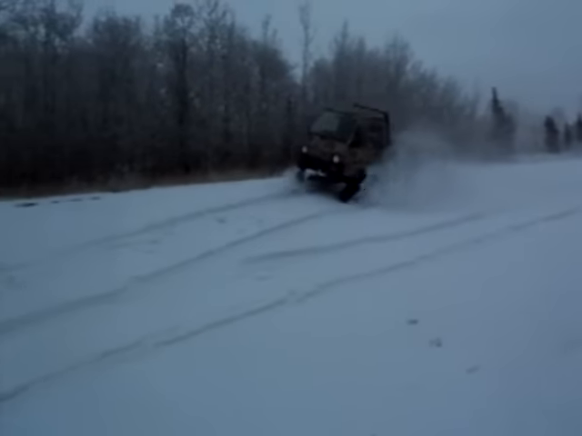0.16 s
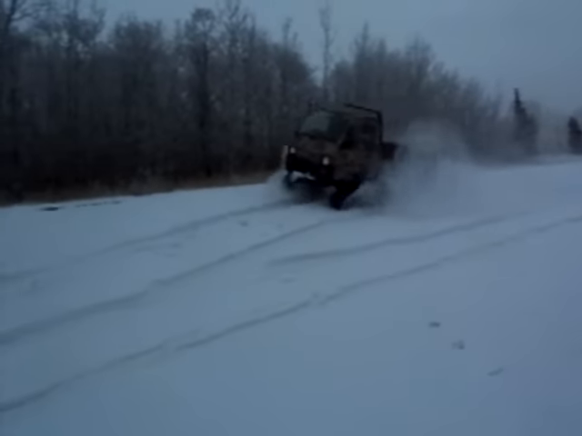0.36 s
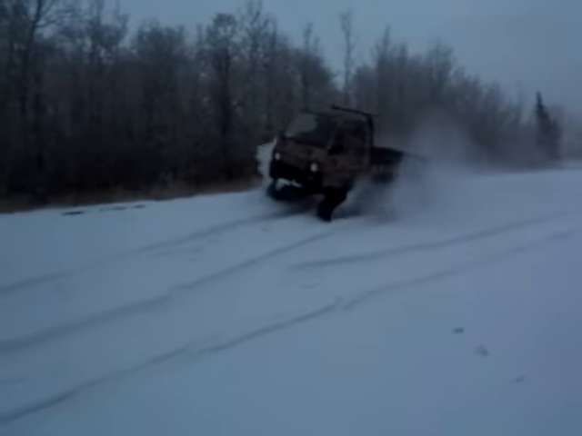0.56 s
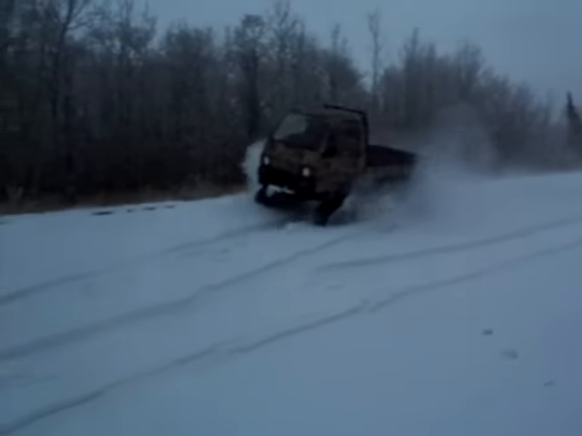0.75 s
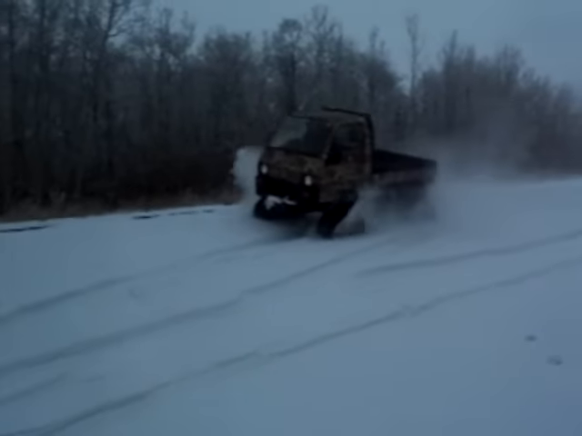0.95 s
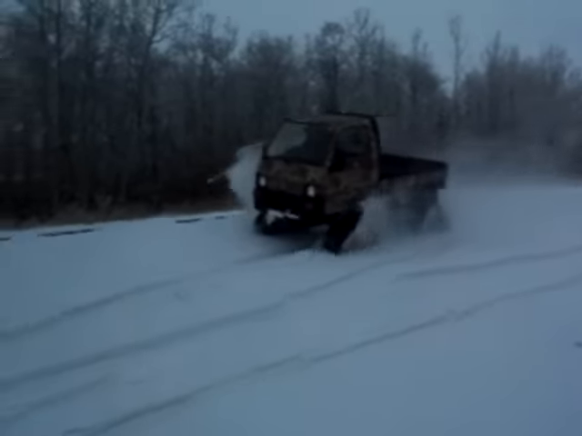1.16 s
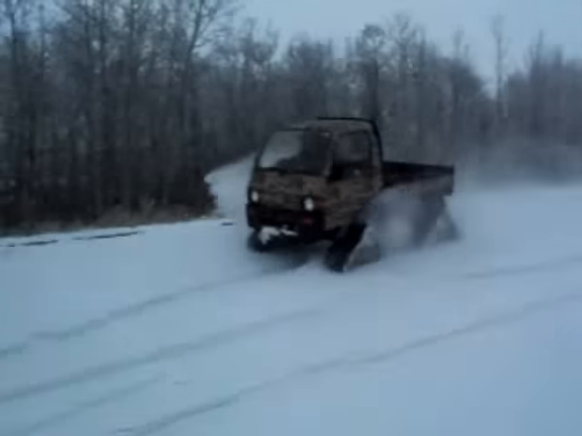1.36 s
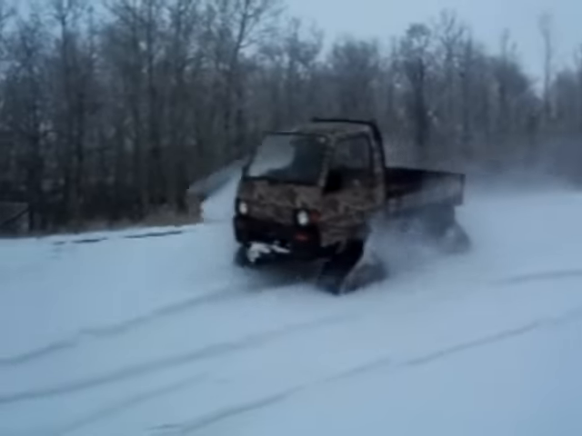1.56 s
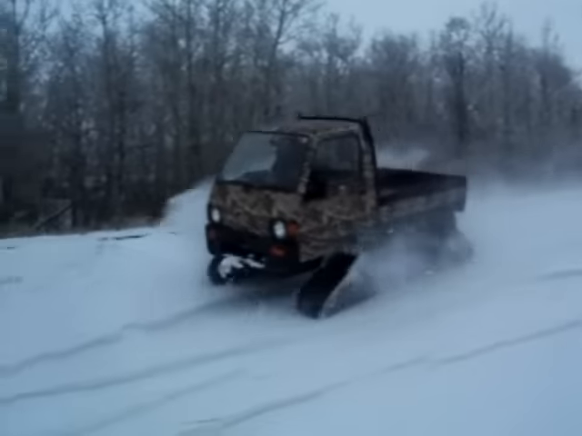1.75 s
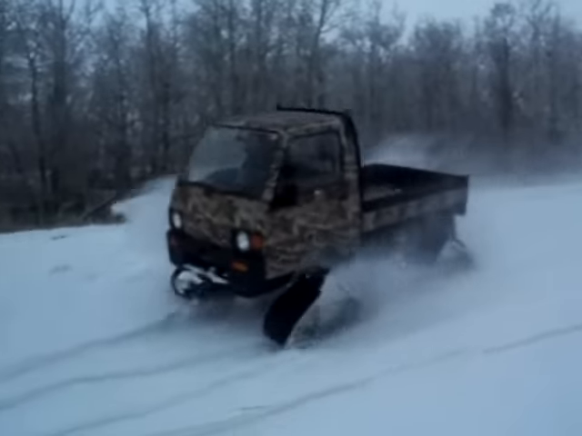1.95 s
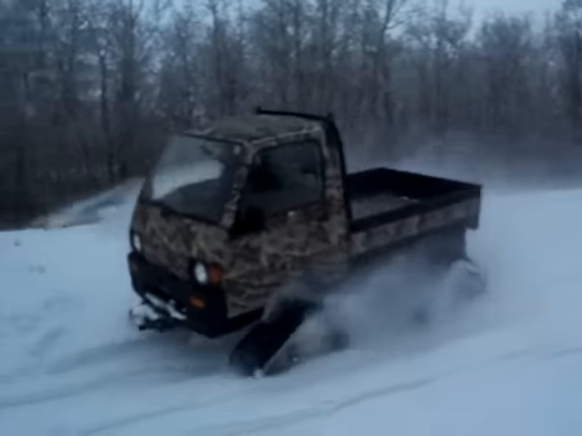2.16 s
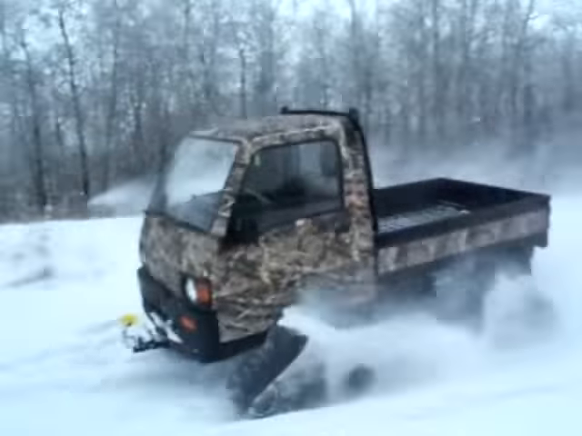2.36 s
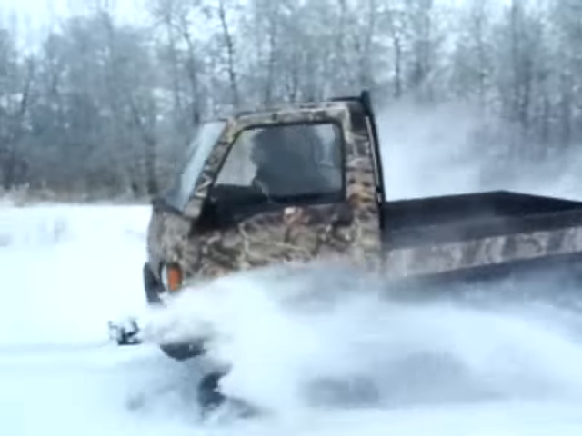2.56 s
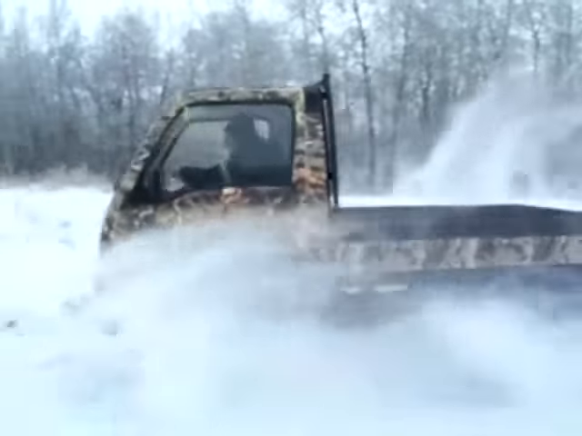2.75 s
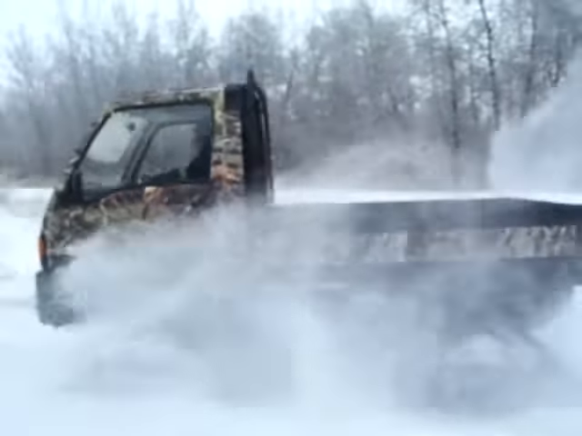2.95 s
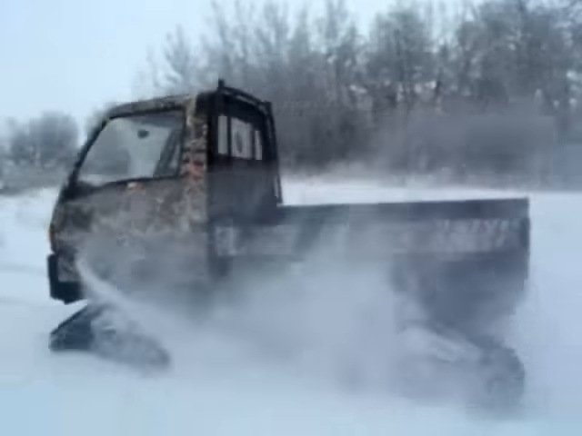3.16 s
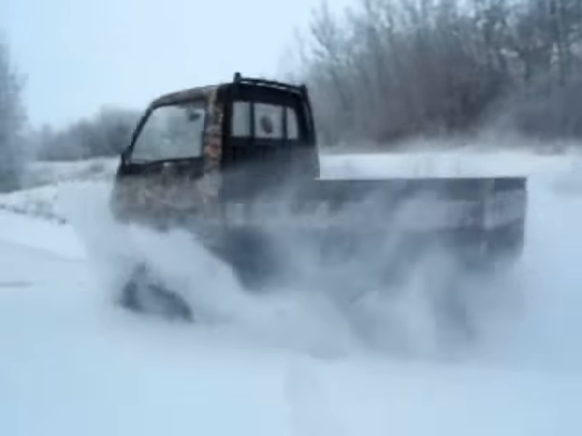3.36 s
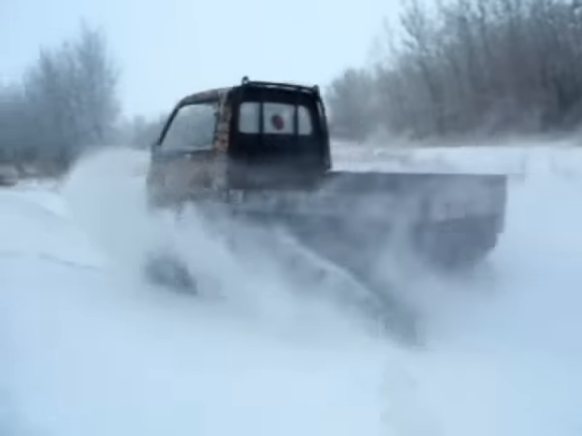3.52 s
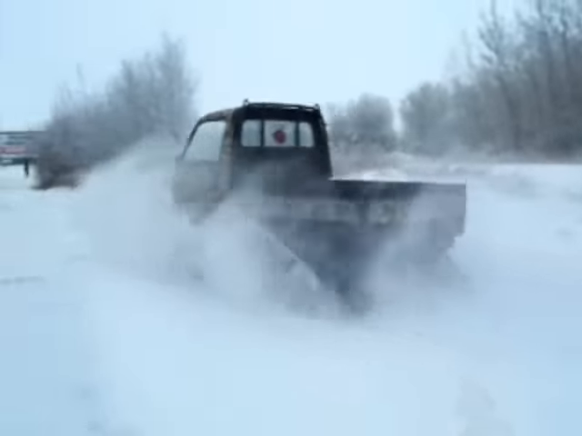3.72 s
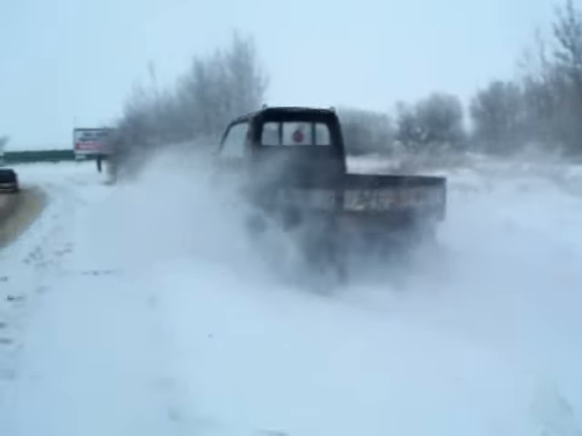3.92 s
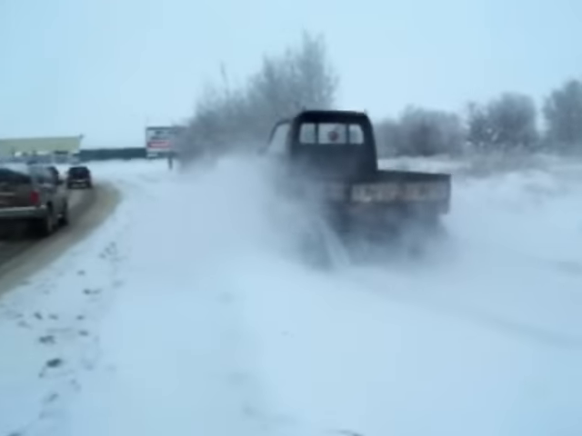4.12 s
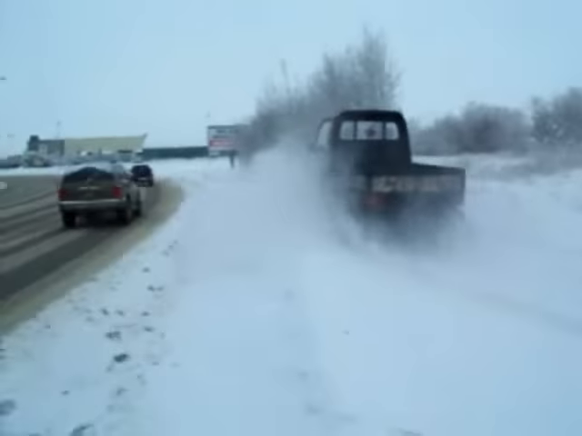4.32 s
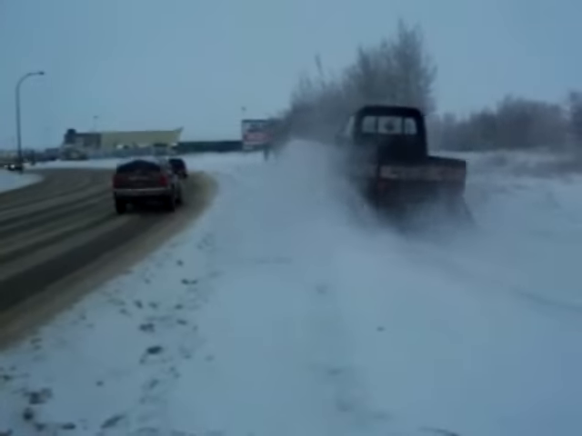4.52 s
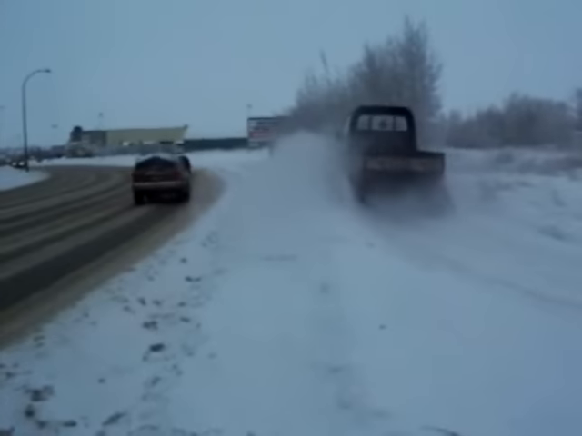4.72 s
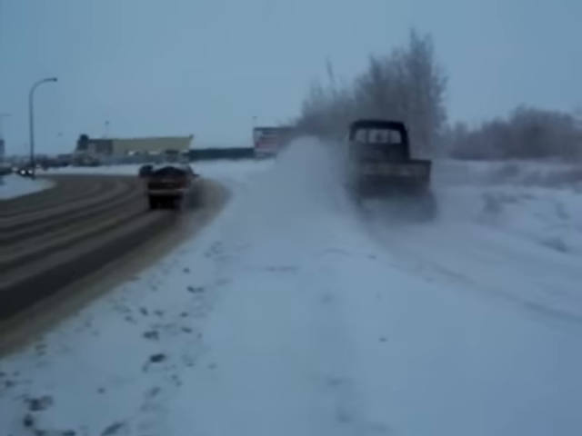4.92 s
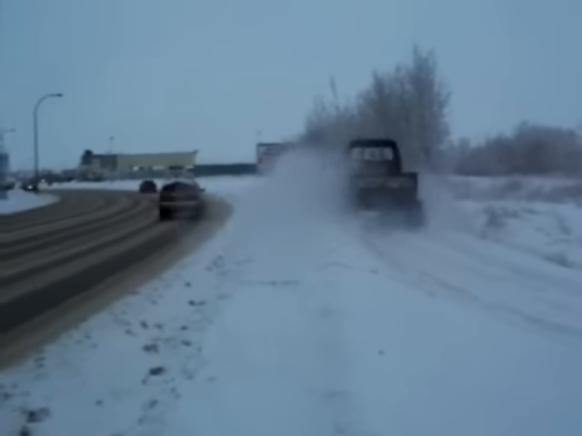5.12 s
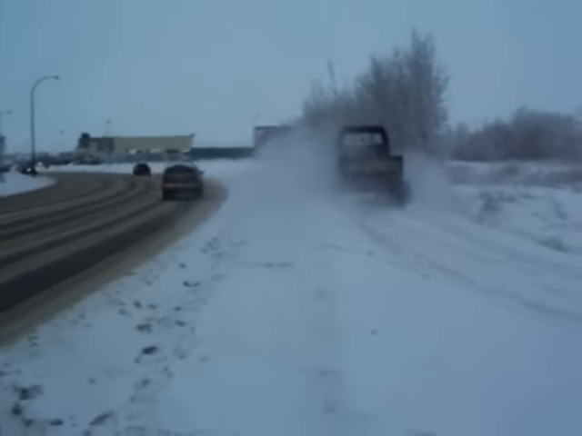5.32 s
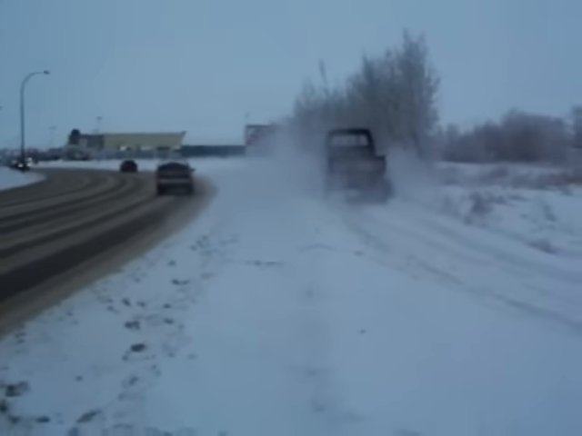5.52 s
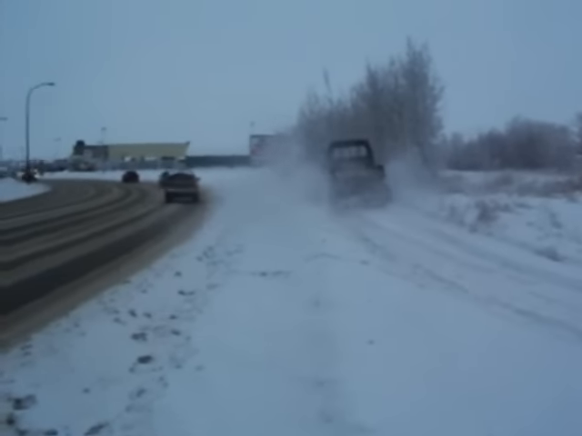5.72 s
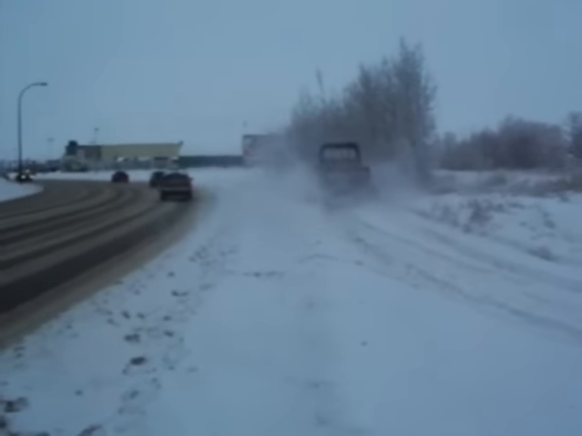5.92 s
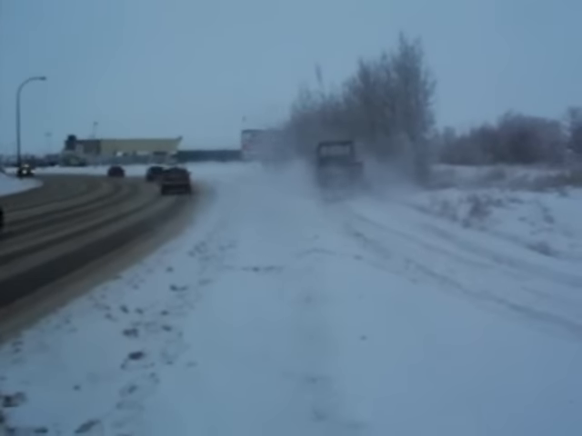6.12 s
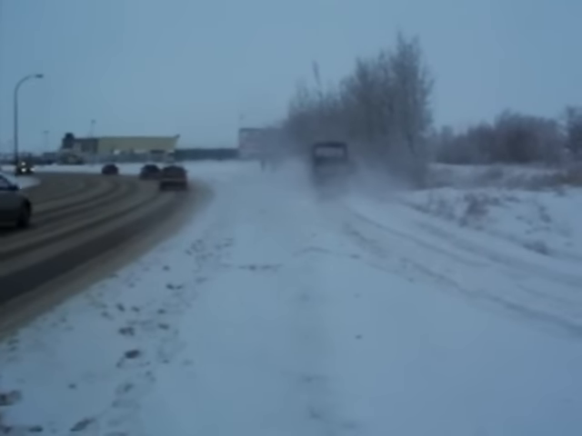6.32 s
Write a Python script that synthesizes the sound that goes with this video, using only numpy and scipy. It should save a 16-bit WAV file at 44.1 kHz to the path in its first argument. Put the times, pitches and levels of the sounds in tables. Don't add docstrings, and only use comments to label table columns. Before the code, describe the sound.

A continuous rough, buzzing drone of tracks and a small engine comes nearer, with metallic panel ringing and dull jolts. Around the middle it sweeps past the hand-held microphone, low throbbing and snow spray at their strongest. Receding, it thins into softer rattle, dry ticking lug slaps and small knocks, over distant road rumble and tyre hiss in an open snowy field.

```python
import sys
import numpy as np
from scipy import signal
from scipy.fft import rfft, irfft
from scipy.io import wavfile
from scipy.ndimage import uniform_filter1d

SR = 44100
rng = np.random.default_rng(int(sys.argv[2]) if len(sys.argv) > 2 else 0)


def wav_out(sig):
    wavfile.write(sys.argv[1], SR, np.round(np.clip(np.atleast_2d(sig).T, -1, 1) * 32767).astype(np.int16))


def amplitude_ratio(level_db):
    exponent = np.asarray(level_db, float) / 20
    return 10 ** exponent


N = 281358
ABREAST_S, TURN_S = 2.8, 0.51

# t/s, lug rate f/Hz, level/dB, second multiple against the first/dB
TRACK_DRUMMING = [(0, 68.2, -34, -19), (.3, 65.8, -40, -19), (.78, 63.9, -32.5, 1), (1.3, 67.6, -32, 2),
                  (1.5, 68.1, -33, 5), (1.65, 69.6, -46, 2), (1.76, 69.8, -34, -7), (2.05, 74.7, -31.5, 4),
                  (2.4, 72.24, -36, 2), (2.63, 75.3, -35, -12), (2.76, 74.9, -34, 12),
                  (2.95, 71.2, -28, -7), (3.1, 73.85, -36, -2), (3.32, 76.4, -29.5, 6),
                  (3.64, 76.5, -34.5, 14), (4.36, 71.9, -40.5, 16), (4.47, 71.74, -41, -4),
                  (6.38, 70.7, -42, 0)]
# t/s, drive-line effort level/dB, thrown snow level/dB
EFFORT_AND_SNOW = [(0, -33.5, -45), (.25, -34.5, -49), (.33, -41, -50.5), (.6, -35.5, -48),
                   (.78, -31.5, -44.5), (1.45, -32.5, -46), (1.62, -34.5, -48.5), (1.95, -31.5, -45),
                   (2.07, -35.5, -49.5), (2.27, -33.5, -46), (2.72, -32.5, -44.5), (3.05, -36.5, -46.5),
                   (3.34, -34.5, -42), (3.43, -36.5, -45), (3.9, -34.5, -42.5), (5.2, -38, -53),
                   (5.63, -36.5, -47), (6.38, -42, -53.5)]
# f/Hz, density/dB per Hz
SNOW_COLOUR = [(1120, -25.5), (1900, -1.5), (2110, -2), (2410, 2.5), (3090, -1.5), (3760, 1.5), (4240, 0.5),
               (5130, -4.5), (6300, -17), (8190, -43), (13900, -120)]


def noise():
    return rng.standard_normal(N)


def unit(x):
    return x / np.sqrt(np.mean(x ** 2))


def peak_one(x):
    return x / np.abs(x).max()


def curves(table):
    s, *columns = np.transpose(table)
    return [np.interp(np.arange(N) / SR, s, c) for c in columns]


def colour(x, points):
    size = 8192
    hz, db = np.transpose(points)
    bin_hz = np.arange(size // 2 + 1) * SR / size
    log_gain = np.log(amplitude_ratio(np.interp(np.log(bin_hz + 1), np.log(hz), db)))
    cepstrum = irfft(log_gain)
    cepstrum[1:size // 2] *= 2
    cepstrum[size // 2 + 1:] = 0
    response = irfft(np.exp(rfft(cepstrum)))
    return signal.fftconvolve(x, response)[:len(x)]


def ring(x, hz, width_hz):
    peak = signal.iirpeak(hz, hz / width_hz, SR)
    return signal.lfilter(*peak, signal.lfilter(*peak, x))


def walk(rate):
    hold = int(SR / rate)
    steps = np.repeat(rng.standard_normal(N // hold + 1), hold)
    return unit(uniform_filter1d(uniform_filter1d(steps, hold), hold)[:N])


def grains(rate, spread_db):
    hit = rng.random(N) < rate / SR
    return noise() * hit * amplitude_ratio(spread_db * np.minimum(rng.exponential(size=N), 3.5))


def burst(chance, decay_s):
    t = np.arange(len(chance)) / SR
    return chance * np.exp(-t / decay_s) * (1 - np.exp(-4 * t / decay_s))


def layer_db(usual_db, per_effort, per_snow, abreast_db, behind_db):
    effort_db, snow_db = curves(EFFORT_AND_SNOW)
    swing = np.tanh((np.arange(N) / SR - ABREAST_S) / TURN_S)
    work_db = per_effort * (effort_db + 36) + per_snow * (snow_db + 47)
    return usual_db + work_db + abreast_db * (1 - swing ** 2) + behind_db * (1 + swing) / 2


def road_rumble():
    # f/Hz, density/dB per Hz
    rumble_colour = [(12, -27), (20, 0), (124, 3.5), (188, 0.5), (304, -5.5), (380, 0), (490, -30),
                     (840, -120)]
    db = layer_db(-41, per_effort=.28, per_snow=.06, abreast_db=4, behind_db=-.5)
    return amplitude_ratio(db + 0.44 * walk(3.9)) * unit(colour(noise(), rumble_colour))


def traffic():
    db = layer_db(-63, per_effort=-1.5, per_snow=.55, abreast_db=-1, behind_db=9.5)
    return amplitude_ratio(db + 0.44 * walk(2.7)) * unit(ring(noise(), 2430, width_hz=2000))


def plume():
    centre_s, length_s, level_db = 3.75, .3, -53
    swell = np.exp(-((np.arange(N) / SR - centre_s) / length_s) ** 2)
    return amplitude_ratio(level_db + 1.0 * walk(16)) * swell * unit(ring(noise(), 5000, width_hz=2400))


def whines():
    whine_notes = [(0, .95, 725, 722, -45.5), (.2, 1.3, 648, 652, -47), (.45, 1.05, 1485, 1500, -52),
                   (2.55, 3.05, 1440, 1475, -43.5), (2.2, 2.37, 1165, 1185, -43),
                   (.85, 1.02, 1090, 1120, -46), (.45, .7, 1130, 1110, -48), (3.1, 3.4, 1770, 1770, -52),
                   (3.2, 3.75, 1003, 995, -46.5), (3.5, 4, 1555, 1535, -51), (4.07, 4.2, 376, 378, -42),
                   (4.38, 4.63, 364, 368, -43), (4.63, 4.8, 372, 374, -48), (4.5, 4.95, 1670, 1660, -53),
                   (4.7, 5.35, 1175, 1155, -51), (.55, 1.2, 4110, 4170, -56), (1.2, 1.5, 4170, 4200, -61),
                   (.7, 1.3, 3350, 3470, -63), (2.35, 2.61, 3800, 3900, -51.5),
                   (2.59, 3.03, 3870, 3900, -53), (3.26, 3.38, 3900, 3860, -53),
                   (3.42, 3.68, 3880, 3860, -52), (3.7, 4.35, 3860, 3780, -56.5),
                   (4.4, 4.75, 4390, 4380, -58.5), (4.5, 5.95, 2910, 2880, -60),
                   (4.9, 5.7, 4310, 4340, -63), (0, .2, 4060, 4050, -59), (2.45, 2.72, 3640, 3600, -55),
                   (2.78, 2.98, 4180, 4260, -55), (3, 3.8, 4300, 4200, -61), (4.7, 5.45, 5010, 5000, -68),
                   (4.5, 6.2, 2250, 2240, -60)]
    out, t = 0, np.arange(N) / SR
    for start, end, first_hz, last_hz, db in whine_notes:
        hz = np.interp(t, (start, end), (first_hz, last_hz)) * (1 + .0065 * walk(60))
        fade = np.clip(np.minimum(t - start, end - t) / 0.025, 0, 1)
        broken = .8 + .26 * walk(25)
        out = out + fade * amplitude_ratio(db) * broken * np.sqrt(2) * np.sin(2 * np.pi * np.cumsum(hz) / SR)
    return out


def engine():
    # t/s, firing rate f/Hz, level/dB
    firing = [(0, 101.4, -42), (.45, 101.7, -49.5), (.8, 103.6, -47.5), (1.3, 106.1, -44.5),
              (1.7, 107, -43), (2.2, 112.1, -52), (2.6, 111, -42), (2.85, 110, -55), (3.5, 112.2, -63),
              (4.1, 110.6, -40.5), (4.3, 108.6, -56), (4.5, 111, -52), (5.55, 117.3, -45.5),
              (5.7, 110.5, -70), (6, 105.3, -44.5), (6.38, 108.3, -46)]
    hz, db = curves(firing)
    turn = 2 * np.pi * np.cumsum(hz * (1 + 0.0077 * walk(17))) / SR
    return amplitude_ratio(db + 1.5 * walk(15)) * np.sqrt(2) * (np.sin(turn) + amplitude_ratio(-20) * np.sin(2 * turn))


def body(broad, grain_db):
    shake = noise() + amplitude_ratio(grain_db) * unit(grains(900, 1.6))
    return unit(colour(shake, broad) * amplitude_ratio(1.03 * walk(18)))


def rattle():
    # f/Hz, density/dB per Hz
    low_body = [(150, -29), (260, -6), (373, -4.5), (434, 1.5), (508, 1), (563, 1.5), (633, 1), (803, -4.5),
                (1000, -5), (1300, -19.5), (2200, -120)]
    # f/Hz, density/dB per Hz
    high_body = [(470, -23), (800, -1.5), (1100, -1.5), (1270, -1.5), (1370, -1), (1760, -6.5),
                 (2050, -16.5), (2300, -20.5), (2990, -32.5), (5060, -120)]
    low_db = layer_db(-38.5, per_effort=1.19, per_snow=-.35, abreast_db=-.7, behind_db=-2)
    high_db = layer_db(-37.5, per_effort=.32, per_snow=.21, abreast_db=.15, behind_db=.24)
    return amplitude_ratio(low_db) * body(low_body, -7) + amplitude_ratio(high_db) * body(high_body, -8)


def panel(hz, width_hz, share, drift):
    passed = (1 + np.tanh((np.arange(N) / SR - ABREAST_S - TURN_S) / TURN_S)) / 2
    gear_hz = hz * drift * (1 - .022 * passed)
    wavering_hz = gear_hz + .3 * width_hz * walk(60)
    note = np.sqrt(2) * np.sin(2 * np.pi * np.cumsum(wavering_hz) / SR)
    return np.sqrt(share) * note + np.sqrt(1 - share) * unit(ring(noise(), hz, 1.6 * width_hz))


def panels():
    # group (0 floor pan, 1 cab, 2 bed), f/Hz, width/Hz, level/dB
    resonances = [
        (0, 380, 40, -12),
        (0, 495, 30, -8),
        (0, 520, 25, -5),
        (1, 645, 30, -8.5),
        (1, 720, 36, -8),
        (2, 1235, 35, -13),
        (2, 1292, 30, -6.5),
    ]
    # group, start t/s, end t/s, level/dB
    spells = [(0, .7, .98, -37.5), (0, .98, 1.25, -41), (0, 1.25, 1.6, -42), (0, 1.75, 2.02, -38.5),
              (0, 2.02, 2.45, -42), (0, 2.6, 3.5, -45), (0, 3.6, 4.62, -41), (1, 0, .28, -42),
              (1, .72, .97, -36), (1, .97, 1.55, -40), (1, 1.8, 2.05, -39), (1, 2.56, 2.8, -34),
              (1, 2.8, 3.03, -36), (1, 3.15, 3.4, -38), (1, 3.4, 3.75, -42), (1, 3.75, 4.5, -37.5),
              (1, 4.6, 6.38, -44), (2, 0, .3, -41), (2, .3, 1.35, -35.5), (2, 1.35, 1.67, -38),
              (2, 1.9, 2.06, -36), (2, 2.22, 2.56, -36.5), (2, 2.56, 3.02, -41), (2, 3.76, 4.3, -38)]
    # t/s, floor pan share, bed share
    gear_drift = [(.8, 1, 1), (.95, 1, .978), (1.35, 1, .97), (1.48, 1.01, 1.008), (1.65, 1, 1),
                  (1.92, 1.01, .955), (2.05, .97, .96), (2.25, .96, .965), (2.4, .935, .995),
                  (2.6, 1, 1.008), (3.05, 1, 1.01)]
    fade_s, resting_db = 0.046, -53.5
    t, groups = np.arange(N) / SR, np.full((3, N), amplitude_ratio(resting_db))
    for group, start, end, db in spells:
        fade = np.clip(np.minimum(t - start, end - t) / fade_s + .5, 0, 1)
        groups[int(round(group))] += amplitude_ratio(db) * fade
    floor_pan, bed = curves(gear_drift)
    drift = (floor_pan, 1, bed)
    tone_share = (.65, .7, .92)
    out = 0
    for group, hz, width_hz, db in resonances:
        group = int(round(group))
        gain = groups[group] * amplitude_ratio(db + .7 * walk(5))
        out = out + gain * panel(hz, width_hz, tone_share[group], drift[group])
    return out


def jolts():
    # t/s, peak level/dB, ring f/Hz
    ruts = [(0.692, -25.5, 521), (0.748, -19.5, 527), (0.834, -19.5, 529), (0.892, -21, 637),
            (0.955, -24.5, 500), (1.066, -23, 535), (1.152, -22, 517), (1.212, -23, 616), (1.348, -24, 514),
            (1.546, -21.5, 524), (1.674, -26, 645), (1.726, -27, 498), (1.793, -25, 498), (1.856, -27, 524),
            (1.906, -27, 523), (2.29, -31, 490), (2.385, -34, 470), (2.414, -26, 415), (2.601, -24, 591),
            (2.631, -30, 546), (2.673, -23, 509), (2.78, -27, 768), (2.896, -23, 637), (2.942, -23.5, 690),
            (2.982, -29, 735), (3.136, -25, 704), (3.253, -31, 619), (3.935, -22.5, 615), (3.979, -20, 636),
            (4.087, -26, 708), (5.556, -31, 1553), (5.571, -29, 788), (5.586, -31, 1598),
            (5.631, -24, 1497), (5.652, -32, 1560), (5.714, -26, 1600), (5.764, -27, 791)]
    out, t = np.zeros(N), np.arange(4000) / SR
    rise_s, decay_s, trim_db = .003, .011, -7
    shape = peak_one(np.exp(-t / decay_s) * (1 - np.exp(-t / rise_s)))
    for (s, db, hz), chance in zip(ruts, rng.standard_normal((len(ruts), len(t)))):
        rough = .35 * unit(ring(chance, hz, 250))
        at = int(s * SR)
        out[at:at + len(t)] += amplitude_ratio(db + trim_db) * shape * (np.sin(2 * np.pi * hz * t) + rough)
    return out


def knocks():
    # t/s, peak level/dB, ring f/Hz
    thuds = [(.1635, -24, 800), (0.1667, -17, 1040), (0.213, -20, 1000), (0.2414, -11.5, 690),
             (0.247, -21, 600), (5.425, -25, 1400), (5.548, -32, 1400), (5.56, -31, 1600),
             (5.732, -24, 1200), (5.585, -27, 1300), (5.61, -28, 1500), (5.675, -27, 1300),
             (5.632, -22, 1530), (5.645, -26, 1300), (5.66, -22, 1490), (5.718, -25, 1500)]
    out, t = np.zeros(N), np.arange(2000) / SR
    shape = (t / 0.00087) * np.exp(1 - t / 0.00063)
    for s, db, hz in thuds:
        at = int(s * SR)
        out[at:at + len(t)] += amplitude_ratio(db) * np.sin(2 * np.pi * hz * t) * shape
    return out


def clods():
    # t/s, peak level/dB
    splashes = [(.164, -30), (.2465, -26), (.772, -33), (.83, -33), (.887, -32), (2.22, -33), (2.2485, -34),
                (2.28, -35), (2.3044, -37), (2.3326, -28), (2.36, -35), (2.41, -33), (2.4412, -32),
                (5.545, -38), (5.5594, -32), (5.575, -32), (5.62, -36), (5.655, -36), (5.74, -35)]
    out, size = np.zeros(N), 2000
    for (s, db), chance in zip(splashes, rng.standard_normal((len(splashes), size))):
        at = int(s * SR)
        out[at:at + size] += amplitude_ratio(db - 3) * peak_one(colour(burst(chance, .005), SNOW_COLOUR))
    return out


def spray():
    # f/Hz, density/dB per Hz
    fine_colour = [(4500, -36.5), (6300, -9), (6800, -7), (7400, -6.5), (8050, -13), (8700, -7),
                   (9400, -28), (11000, -65.5)]
    # f/Hz, density/dB per Hz
    finest_colour = [(7000, -30), (8050, -7), (8700, -1), (9150, -1.5), (9450, -26), (11000, -66)]
    lug_hz, coarse_db = curves(TRACK_DRUMMING)[0], curves(EFFORT_AND_SNOW)[1] - .7
    fine_db = layer_db(-59, per_effort=0, per_snow=.82, abreast_db=-1, behind_db=-3.5)
    finest_db = layer_db(-62.5, per_effort=-.04, per_snow=1.3, abreast_db=-1.5, behind_db=-1.5)
    turn = np.cumsum(lug_hz) / SR / 2 % 1
    back_shown_s = 4.3
    depth = np.clip(.3 + .3 * walk(2), 0, 2) * (np.arange(N) < back_shown_s * SR)
    pulse = (1 + depth * np.exp(-turn / .13)) / (1 + .15 * depth)
    hiss = (noise() + amplitude_ratio(-7) * unit(grains(800, 1.8))) * pulse
    hiss = hiss * amplitude_ratio(.55 * walk(10) + .6 * walk(25))
    coarse = amplitude_ratio(coarse_db) * unit(colour(hiss, SNOW_COLOUR))
    fine = amplitude_ratio(fine_db + .6 * walk(9)) * unit(colour(hiss, fine_colour))
    finest = amplitude_ratio(finest_db) * unit(colour(hiss, finest_colour))
    return coarse + fine + finest


def slap_times():
    # t/s, snap level/dB, top level/dB
    first_run = [(4.3134, -41, -49), (4.3266, -34, -42), (4.3574, -35, -58), (4.3854, -31, -45),
                 (4.4154, -31, -41), (4.4428, -33, -46), (4.4727, -33, -41), (4.4994, -37, -48),
                 (4.5276, -32, -43), (4.557, -32, -45), (4.5865, -38, -47), (4.6144, -36, -45),
                 (4.6458, -36, -45), (4.6748, -34, -39), (4.7067, -37, -46), (4.7354, -38, -45),
                 (4.7654, -38, -54), (4.796, -36, -43), (4.8234, -36, -45), (4.8524, -31, -39),
                 (4.8813, -33, -42), (4.9107, -32, -42), (4.9374, -37, -48), (4.9656, -32, -45)]
    # t/s, snap level/dB, top level/dB
    lone = [(5.0545, -34, -54), (5.082, -40, -59), (5.1533, -40, -53), (5.178, -40, -64),
            (5.2773, -36, -49), (5.346, -41, -62), (5.3769, -44, -61), (5.4238, -34, -45),
            (5.437, -44, -46), (5.461, -44, -56), (5.484, -42, -49), (5.536, -40, -60), (5.555, -37, -53),
            (5.565, -32, -46), (5.629, -43, -49), (5.6498, -34, -48), (5.6787, -40, -48),
            (5.7135, -34, -50), (5.726, -38, -47), (5.7877, -33, -47), (5.799, -34, -42),
            (5.8448, -32, -49), (5.87, -35, -49), (5.915, -39, -58), (5.9256, -35, -48), (5.9548, -38, -43),
            (5.9825, -35, -40), (6.0339, -37, -47), (6.071, -43, -58), (6.092, -37, -48), (6.107, -43, -48),
            (6.152, -33, -54)]
    # t/s, snap level/dB, top level/dB
    last_run = [
        (6.1933, -32, -46),
        (6.2208, -33, -48),
        (6.2467, -32, -46),
        (6.2781, -35, -57),
        (6.3046, -31, -44),
        (6.332, -28, -46),
        (6.3584, -30, -47),
    ]
    return np.vstack([first_run, lone, last_run])


def slaps():
    # t/s, snap f/Hz, smack level against the snap/dB
    slap_colour = [
        (4.3, 3600, -6),
        (4.9, 3600, -6),
        (5.1, 3600, -3),
        (5.5, 4500, -4),
        (5.95, 4600, -6),
        (6.2, 2900, -9),
    ]
    out, size = np.zeros(N), 600
    rows, (when, *colours) = slap_times(), np.transpose(slap_colour)
    for (s, db, top_db), chance in zip(rows, rng.standard_normal((len(rows), size))):
        puff = signal.unit_impulse(size) + .16 * burst(chance, .0018)
        snap_hz, smack_db = (np.interp(s, when, c) for c in colours)
        snap = peak_one(ring(puff, snap_hz, 2500))
        top = peak_one(ring(puff, 7000, 1300))
        finest = peak_one(ring(puff, 9100, 900))
        smack = peak_one(ring(puff, 1800, 1200))
        at = int((s + .0006) * SR)
        out[at:at + size] += amplitude_ratio(db + 3.5) * (snap + amplitude_ratio(smack_db + 2 * chance[1]) * smack)
        out[at:at + size] += amplitude_ratio(top_db) * (top + amplitude_ratio(-6) * finest)
    next_lug = int(SR / 70)
    follower = np.roll(out, next_lug) * (np.arange(N) > next_lug)
    return out + amplitude_ratio(-10 + 2 * walk(40)) * follower


def tracks():
    # multiple of the lug rate, centre t/s, length/s, level/dB
    throbs = [(1, 1.53, .07, -37), (1, 1.71, .08, -33), (1, 1.8, .2, -36), (1, 1.98, .14, -34),
              (1, 2.12, .24, -35), (1, 2.32, .08, -33), (1, 2.45, .12, -37), (1, 2.64, .1, -30),
              (1, 2.86, .07, -32), (1, 2.94, .09, -29), (1, 3.03, .1, -36), (1, 3.51, .18, -39),
              (1, 4.18, .07, -38), (1, 4.47, .06, -41), (1, 5.27, .08, -38), (2, 1.3, .12, -37),
              (2, 1.48, .11, -32), (2, 1.66, .06, -36), (2, 1.75, .07, -35), (2, 1.86, .1, -37),
              (2, 2.07, .14, -37), (2, 2.23, .07, -33), (2, 2.29, .07, -35), (2, 2.38, .1, -38),
              (2, 2.6, .06, -37), (2, 2.68, .05, -37), (2, 2.78, .12, -33), (2, 2.91, .07, -34),
              (2, 3.02, .11, -33), (2, 3.12, .11, -34), (2, 3.25, .14, -30), (2, 3.35, .12, -31),
              (2, 3.49, .16, -39), (2, 3.65, .09, -34), (2, 3.79, .14, -34), (2, 3.9, .1, -33),
              (2, 4.13, .12, -36), (2, 4.03, .12, -37), (2, 4.23, .1, -36), (2, 4.39, .09, -37),
              (3, 2.5, .14, -44), (3, 2.7, .2, -42), (3, 2.8, .1, -42), (3, 3.25, .12, -43)]
    hz, db, second_db = curves(TRACK_DRUMMING)
    first_db = db + 0.5 - 10 * np.log10(1 + amplitude_ratio(2 * second_db))
    third_db = db + layer_db(-17, per_effort=0, per_snow=0, abreast_db=5, behind_db=3) - 2.5
    between_db = -7
    gains = amplitude_ratio(np.array([first_db + between_db, first_db + second_db + between_db, third_db]))
    for multiple, s, length, throb_db in throbs:
        row = int(round(multiple)) - 1
        away = np.clip((np.arange(N) / SR - s) / length, -.75, .75)
        gains[row] = np.maximum(gains[row], amplitude_ratio(throb_db) * np.cos(away * np.pi / 1.5))
    out = 0
    for pair_db, slip in ((-1.5, .014), (-10.5, .05)):
        turn = 2 * np.pi * np.cumsum(hz * (1 + slip * walk(9))) / SR
        for k, gain in enumerate(gains):
            out = out + gain * amplitude_ratio(pair_db + 1.0 * walk(18)) * np.sqrt(2) * np.sin((k + 1) * turn)
    return out


def scene():
    background = road_rumble() + traffic() + plume()
    machinery = whines() + engine() + rattle() + panels()
    impacts = jolts() + knocks() + clods()
    return (background + machinery + impacts + spray() + slaps() + tracks())[None]


def low_pass(x):
    return signal.sosfilt(signal.butter(12, 9730, fs=SR, output="sos"), x)


def record(dry):
    housing = dry - .5 * signal.lfilter(*signal.iirpeak(6250, 7, SR), dry)
    stop_fade_s = .008
    housing = housing * np.clip((N - 1 - np.arange(N)) / SR / stop_fade_s, 0, 1)
    top = signal.cheby2(8, 50, 9950, fs=SR, output="sos")
    return low_pass(signal.sosfilt(top, housing))


dry = scene()
out = record(dry)
wav_out(out)
```